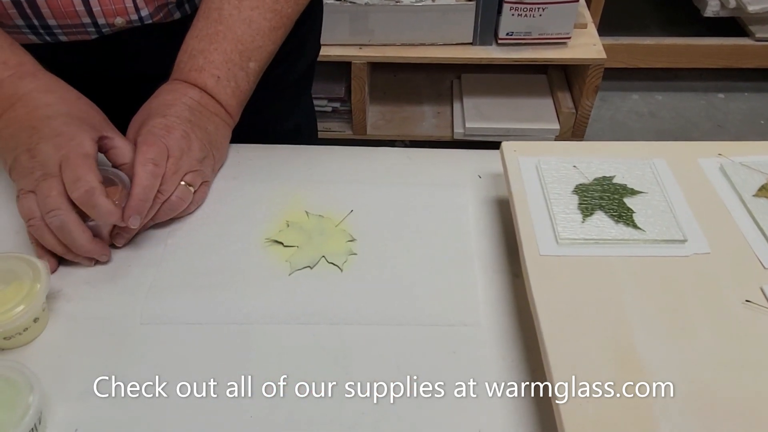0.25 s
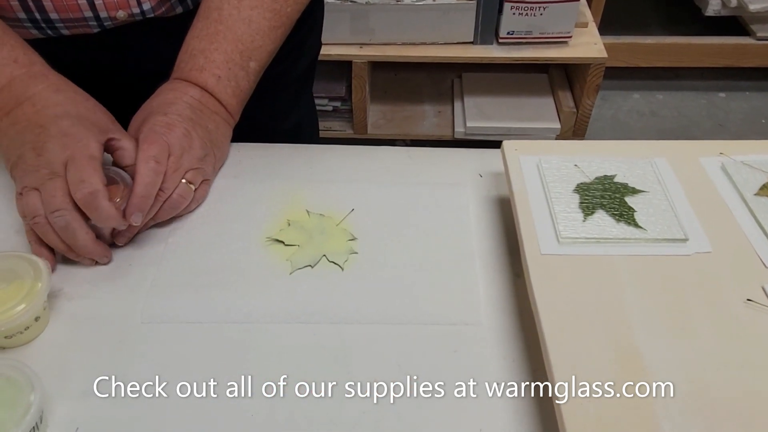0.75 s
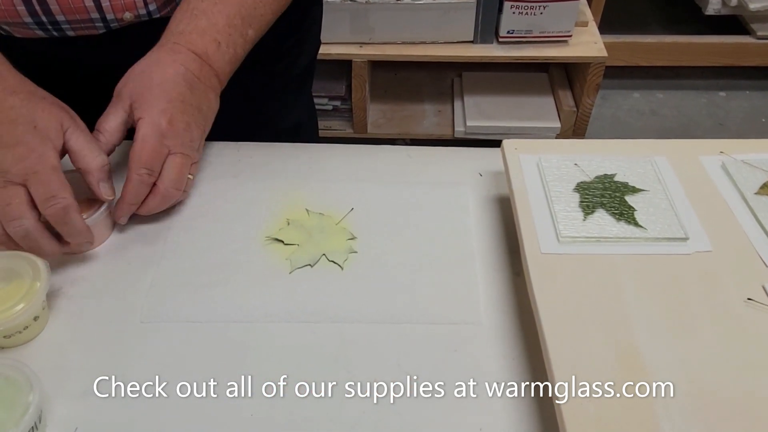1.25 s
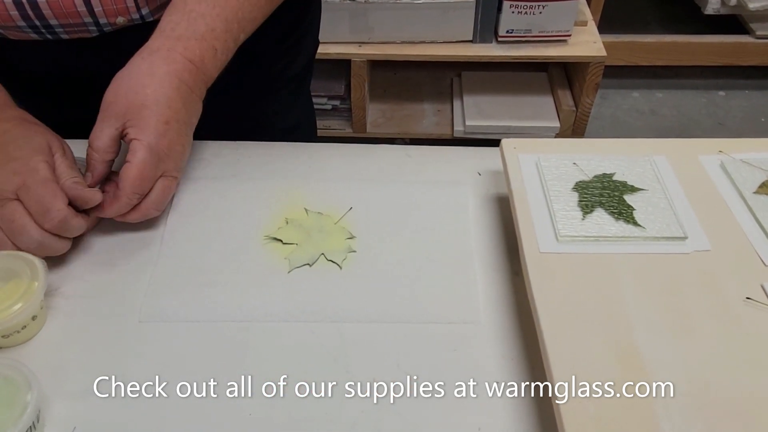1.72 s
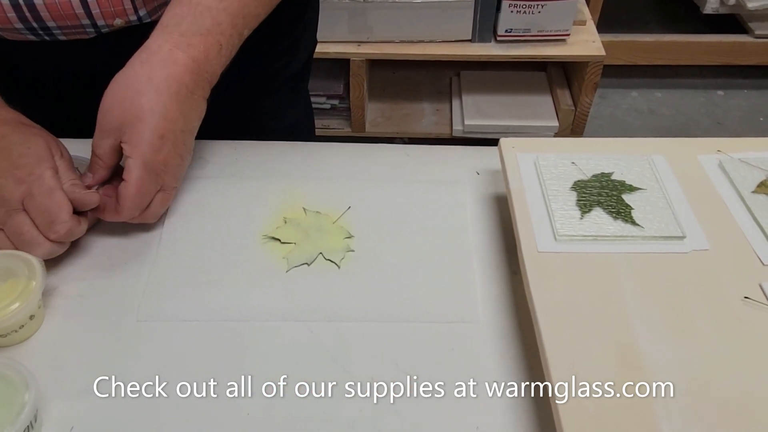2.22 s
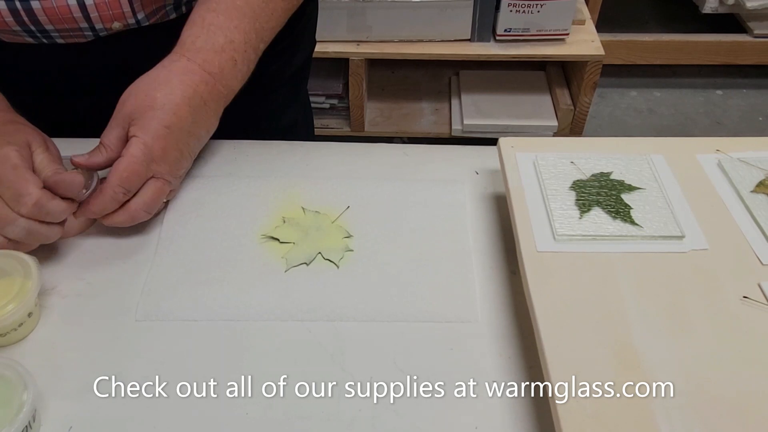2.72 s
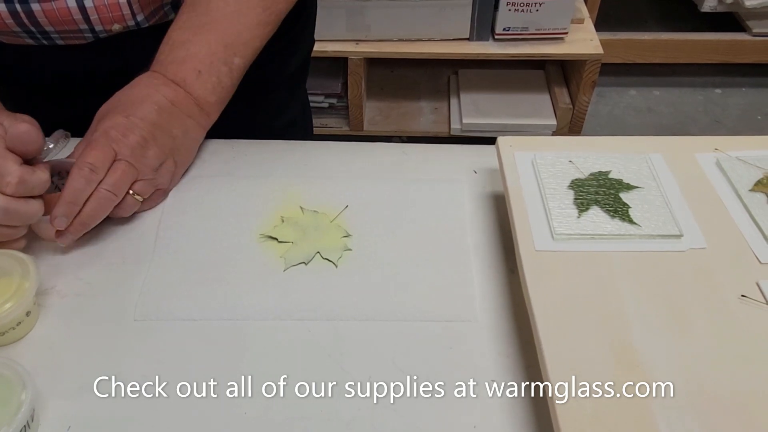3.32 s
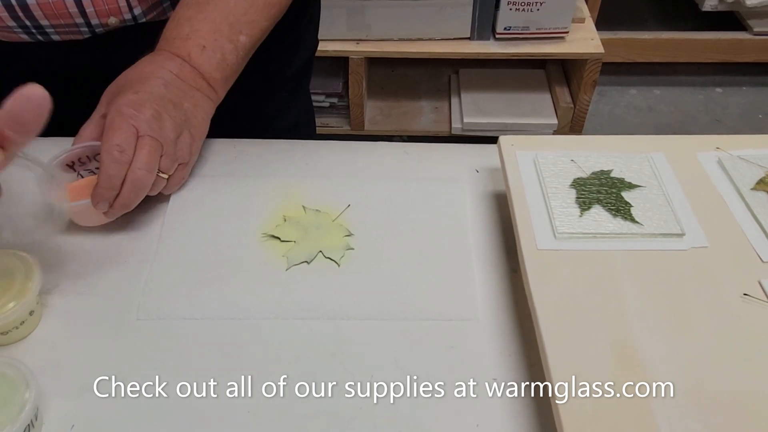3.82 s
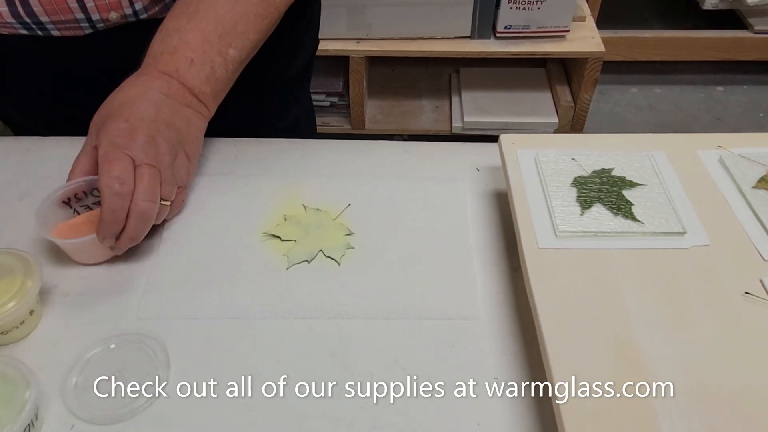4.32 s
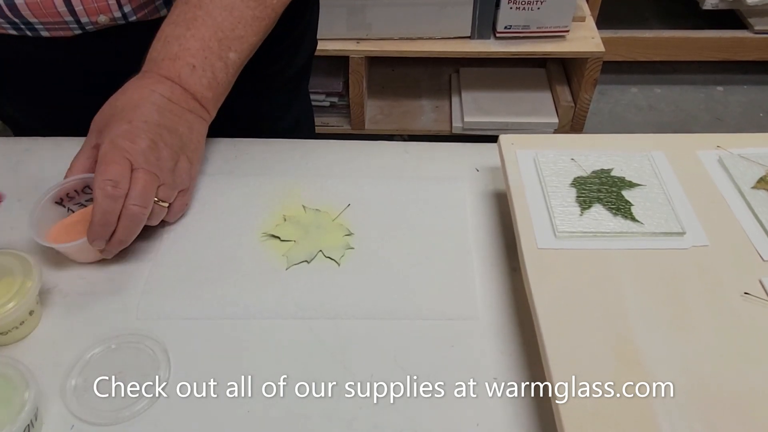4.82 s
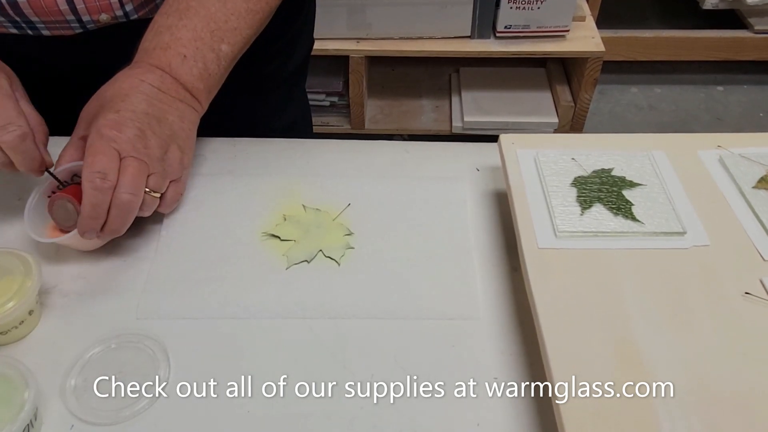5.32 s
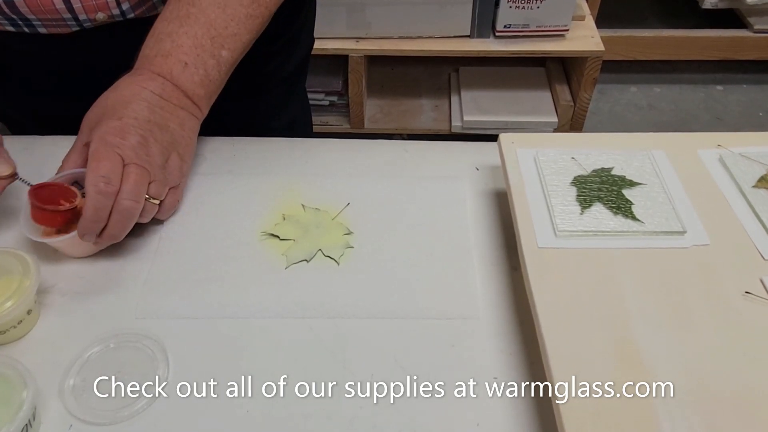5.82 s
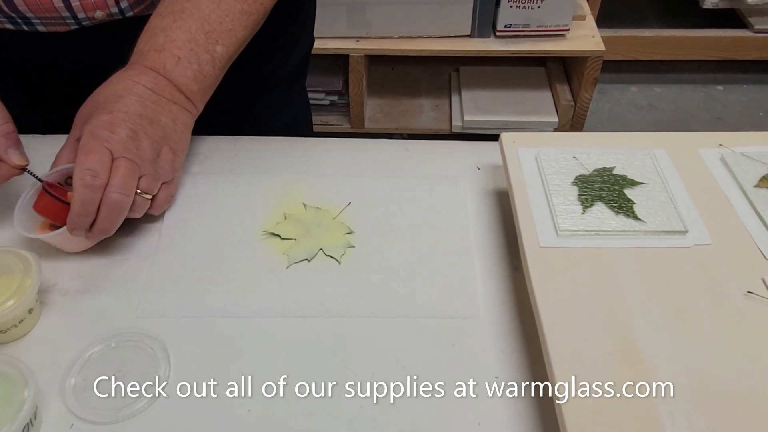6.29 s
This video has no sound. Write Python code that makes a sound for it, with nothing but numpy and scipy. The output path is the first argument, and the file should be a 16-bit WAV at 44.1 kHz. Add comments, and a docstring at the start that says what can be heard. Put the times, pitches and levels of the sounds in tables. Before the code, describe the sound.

Fingers rub and snap a lid off a small plastic cup and drop it rattling on a workbench, with ventilation humming.

```python
"""Prying the lid off a plastic cup

Hands knock a small cup on a workbench, rub round its rim (stick-slip friction) and pry the lid off.
The rim lets go in four sharp snaps; the lid pops free, is dropped and rattles to rest; a scoop goes in.
Each impact rings the damped modes of the plastic. Two microphone ports on a camera hear it all
in a small workshop, over ventilation noise and the low beating hum of motors."""
import sys
import numpy as np
from scipy import signal
from scipy.fft import rfft, irfft, next_fast_len
from scipy.io import wavfile
from scipy.ndimage import uniform_filter1d

SR = 44100
rng = np.random.default_rng(int(sys.argv[2]) if len(sys.argv) > 2 else 0)


def int16_out(signal):
    """Quantize to a 16-bit WAV file."""
    q = np.round(np.clip(np.atleast_2d(signal).T, -1, 1) * 32767)
    wavfile.write(sys.argv[1], SR, q.astype(np.int16))


N = 288855

# Modes of the rim. Each row: frequency in Hz, relative level in dB, 60 dB decay time in seconds.
RIM_RESONANCES = [(1340, -11.5, 0.016), (2000, -9, 0.013), (2440, -8, .009), (3836, -6, 0.007),
                  (4590, 2, 0.012), (5150, 4, 0.012), (6940, -1.5, 0.0039), (7990, -7.5, 0.00802),
                  (13330, -2.5, 0.006)]
# What the struck rim radiates at full focus. Each row: frequency in Hz, relative level in dB.
RIM_SPECTRUM = [(550, -23.5), (1700, -9), (4100, 0), (7700, -4), (12600, -20.5)]


def rim_snaps():
    """Sudden release of elastic strain: the rim slips over the cup's lip and rings."""
    # Each row: start in seconds, level in dB, tilt in dB per octave, focus, pitch factor due to strain.
    snaps = [(0.903, -45.5, 0, 0.4, 0.62), (1.1768, -54.5, 0, 0.086, 0.89), (1.1947, -57.5, 4.5, 0.13, .9),
             (1.5354, -51.5, 7, .5, 1), (1.5652, -51, 5.5, 0.59, 1.1), (1.6171, -60.5, 4, 0.18, 1.03),
             (1.987, -64, -4, 0.17, 0.44), (2.015, -33.5, 0, 0.42, .67), (2.116, -27, 1.3, 0.99, 1.02),
             (2.2216, -29.5, 0.7, 0.65, 0.7), (2.3798, -19, 0, 0.91, 1.0),
             (2.5625, -45.5, -1.5, 0.084, 0.89), (2.6866, -45, -1, 0.16, 1.17),
             (3.136, -60, 9.5, 0.23, .99), (3.4859, -50.5, -4, 0.49, 1.46), (3.574, -51, 3.5, 0.55, 1)]
    return impacts(snaps, RIM_RESONANCES, RIM_SPECTRUM,
                   crack_db=7.5, crack_s=0.0016, scatter=0.047, trim_db=-1)


def lid_pop():
    """Free vibration after release: the lid pops clear of the cup."""
    pop = [(3.4271, -28, 0, 1)]  # Each row: start in seconds, level in dB, tilt in dB per octave, focus.
    modes = [(728, -9.5, 0.028), (1140, -10.5, 0.015), (1380, -3, 0.016), (1970, -3.5, 0.0082),
             (2700, -3, 0.011), (4870, 1.5, 0.015)]  # Each row: frequency in Hz, level in dB, 60 dB decay time in seconds.
    spectrum = [(550, -9.5), (1700, 0), (4100, -9.5), (7700, -14), (12600, -23)]  # Each row: frequency in Hz, radiated level in dB.
    return impacts([(*row, 1) for row in pop], modes, spectrum,
                   crack_db=3, crack_s=0.0014, scatter=0.0084, trim_db=-1)


def lid_bounces():
    """Inelastic collisions: the dropped lid rings at each bounce as it settles."""
    bounces = [(4.0349, -34.5, 0.45), (4.0388, -42, 0.33), (4.089, -26.5, 1.15), (4.1185, -25, 1.19),
               (4.1261, -40, 0.66), (4.1311, -38, 1.4), (4.1725, -42.5, 1.1), (4.1989, -35, 1.1),
               (4.2196, -34, 0.96), (4.237, -40.5, 0.69), (4.2437, -36.5, .9), (4.2528, -46, 0.83),
               (4.262, -42.5, 0.88), (4.2781, -42, 0.71), (4.3117, -47, 0.84), (4.3319, -45.5, .65),
               (4.3471, -41.5, 0.78)]  # Each row: start in seconds, level in dB, focus.
    modes = [(1220, -17, 0.081), (2077, -9, 0.057), (2532, -0.5, 0.075), (2637, 1, 0.031),
             (2870, -2, 0.024), (3300, -15, .05), (3700, -6.5, 0.033), (3870, -10, 0.02), (4150, -3, 0.021),
             (4630, -5, 0.011), (5300, -9, 0.012), (6500, -29, 0.014), (8260, -12, 0.028),
             (8780, -7.5, 0.022)]  # Each row: frequency in Hz, level in dB, 60 dB decay time in seconds.
    spectrum = [(550, -17), (1700, 0), (4100, -1), (7700, -11.5), (12600, -19)]  # Each row: frequency in Hz, radiated level in dB.
    return impacts([(s, db, 0, focus, 1) for s, db, focus in bounces], modes, spectrum,
                   crack_db=4.5, crack_s=0.0021, scatter=0.0096, trim_db=0)


def cup_knocks():
    """Impulse response of a shell: the bench or the scoop knocks the cup."""
    knocks = [(0.0185, -23.5, 1, 0.55), (0.0271, -30.5, 1.5, 1.3), (0.5955, -53.5, -4.5, .7),
              (5.5426, -68, -5, 0.8)]  # Each row: start in seconds, level in dB, tilt in dB per octave, focus.
    modes = [(370, -17, 0.08), (577, -8, 0.038), (771, 1.5, 0.053), (835, 0.5, 0.034), (1056, -0.5, 0.03),
             (1110, -2, 0.03), (1400, -4.5, .028), (1705, -15, 0.016), (2050, -1, 0.018),
             (2835, -8.5, .025), (3610, -7.5, .02), (5414, -14, .012)]  # Each row: frequency in Hz, level in dB, 60 dB decay time in seconds.
    spectrum = [(550, 1), (1700, 3), (4100, -7.5), (7700, -14.5), (12600, -21.5)]  # Each row: frequency in Hz, radiated level in dB.
    return impacts([(*row, 1) for row in knocks], modes, spectrum,
                   crack_db=9.5, crack_s=0.0023, scatter=0.007, trim_db=0.5)


def scoop_ticks():
    """Brief contact gives a broad spectrum: the scoop ticks lightly against the cup."""
    ticks = [(5.741, -71.5), (6.3523, -74), (6.368, -69.5), (6.412, -69.5)]  # Each row: start in seconds, level in dB.
    return impacts([(s, db, 0, 0.1, 0.9) for s, db in ticks], RIM_RESONANCES, RIM_SPECTRUM,
                   crack_db=8, crack_s=0.0012, scatter=0.041, trim_db=0.5)


def impacts(blows, modes, spectrum, crack_db, crack_s, scatter, trim_db):
    """Modal superposition plus a noise crack; focus 0 is a flat tick, 1 the full spectrum.
    Levels are relative. A thin wall radiates unevenly: row 0 goes to the camera, two into the room."""
    bands = [(300, 1000), (1000, 2800), (2800, 6000), (6000, 10000), (10000, 16000)]  # Thud, knock, crack, tick, fizz. Each row: lower and upper edge in Hz.
    crack_spectrum = [(200, -11.5), (480, -8.5), (900, -4), (5000, 6), (8000, 2), (10700, -5.5),
                      (13000, -5.5), (14300, -6), (16000, -18.5)]  # The bright onset. Each row: frequency in Hz, gain in dB.
    t, directions = np.arange(SR // 7) / SR, np.zeros((3, N))
    hz, db, t60 = np.transpose(modes)[:, :, None]
    attack_samples, f = 323, np.fft.rfftfreq(2048, 1 / SR)
    centres = np.sqrt(np.prod(bands, axis=1))
    for start, level_db, tilt, focus, pitch in blows:
        band_db = level_db + tilt * np.log2(centres / centres[2]) + focus * curve(spectrum, centres / pitch)
        for direction in directions:
            detune, share, turn = rng.standard_normal((3, len(modes), 1))
            phase = 2 * np.pi * (hz * pitch * (1 + scatter * detune) * t + turn)
            ring = (amp(db + 1.5 * share - 60 * t / t60) * np.sin(phase)).sum(0)
            burst = rng.standard_normal(len(t)) * np.exp(-t / crack_s)
            sound = ring + amp(crack_db) * colour(burst, crack_spectrum)
            for _ in range(2):  # bring each band of the attack toward its level
                power = abs(rfft(sound[:attack_samples], 2048)) ** 2 / (1024 * attack_samples)
                attack_db = [10 * np.log10(power[(f >= lo) & (f < hi)].sum() + 1e-20) for lo, hi in bands]
                sound = colour(sound, np.c_[centres, band_db - attack_db])
            add(direction, start, sound)
    bandpass = signal.butter(2, [260, 14500], "band", fs=SR, output="sos")
    return amp(trim_db) * signal.sosfilt(bandpass, directions)


def finger_rubs(body_db=-0.5, rasp_db=-2, hiss_db=-2):
    """Frictional excitation: strokes sound the cup's hollow, its wall and the skin, over a faint hiss."""
    # Each row: time of firmest grip, rise and fall in seconds, wall rasp in dB,
    # then hollow body and skin hiss in dB relative to the rasp.
    strokes = [(0.385, 0.069, 0.044, -60, 1, -11), (0.655, 0.042, 0.038, -62, 0, -1.5),
               (0.825, 0.12, 0.061, -59.5, -1, -3.5), (0.892, 0.024, 0.045, -48, -6.5, -4),
               (1.02, .11, 0.042, -61.5, 2, -3.5), (1.164, 0.036, 0.051, -57, 3, 1.5),
               (1.29, 0.051, 0.05, -57.5, 3, -1.5), (1.38, 0.046, 0.073, -54.5, 0, 6.5),
               (1.435, 0.073, 0.029, -47.5, -4.5, 3.5), (1.55, 0.043, 0.057, -52.5, -3.5, 2),
               (1.709, 0.043, 0.031, -45.5, -9.5, -3), (2.521, .025, 0.044, -47, -1, 0.5),
               (2.566, 0.038, 0.019, -49.5, 9, -7), (2.64, 0.057, 0.16, -55.5, -2, 1.5),
               (2.729, 0.033, 0.031, -48.5, 5, 2), (2.9, .13, 0.12, -60, 1.5, -1),
               (2.958, .035, 0.016, -47.5, -2.5, -3.5), (3.075, 0.075, 0.083, -46, -3.5, -9.5),
               (3.194, 0.097, 0.068, -49, -2.5, -6.5), (3.412, 0.11, 0.031, -53.5, -2.5, -5),
               (3.559, 0.19, .06, -56, -6.5, -6.5), (3.839, 0.22, 0.12, -63.5, -10, -12.5),
               (6.419, 0.063, .06, -74.5, -4, -6), (6.504, 0.054, 0.022, -56, -1.5, -1.5)]
    # Spectra of hollow, wall and skin. Each row: frequency in Hz, gain in dB.
    body_spectrum = [(120, -7.5), (350, -7), (520, -5.5), (760, 2), (1000, -5.5), (1400, -3.5),
                     (2100, -6.5), (3000, -31.5)]
    rasp_spectrum = [(1900, -23.5), (2650, -6.5), (3500, 0), (4000, -3.5), (4600, -2), (5400, -2.5),
                     (6500, -7.5), (7700, -8), (8700, -21.5)]
    hiss_spectrum = [(4600, -25), (6000, 2), (7500, -0.5), (9400, -5), (11000, -5), (12700, -6.5),
                     (14200, -9.5), (15800, -23)]
    faint_hiss = [(0, -82), (4.0, -78), (4.55, -78.5), (5.3, -84.5), (6.0, -95), (6.55, -97)]  # Thins out toward the end. Each row: time in seconds, level in dB.
    *_, wall, body, skin = np.transpose(strokes)
    hollow = scrape(stroke_envelope(strokes, wall + body + body_db), body_spectrum)
    rasp = scrape(stroke_envelope(strokes, wall + rasp_db), rasp_spectrum)
    hiss = scrape(stroke_envelope(strokes, wall + skin + hiss_db), hiss_spectrum)
    return hollow + rasp + hiss + scrape(faint_hiss, hiss_spectrum)


def stroke_envelope(strokes, peaks_db, drop_db=19.5, roundness=1.35):
    """Incoherent addition: strokes sum in power, each drop_db down one rise or fall from its peak."""
    t = np.arange(0, N, 64) / SR
    peak_s, rise_s, fall_s = np.transpose(strokes)[:3, :, None]
    away = np.maximum((peak_s - t) / rise_s, (t - peak_s) / fall_s)
    power = amp(peaks_db[:, None] - drop_db * abs(away) ** roundness) ** 2
    return np.c_[t, 10 * np.log10(power.sum(0) + 1e-12)]


def rim_grind():
    """Friction under load: the strained rim grinds over the lip just before the loudest snap."""
    envelope = [(2.323, -75), (2.329, -37.5), (2.345, -39.5), (2.376, -41), (2.383, -85)]  # Each row: time in seconds, level in dB.
    spectrum = [(600, -23), (1200, -2), (1700, -9.5), (2250, 1), (2900, -7), (4000, -8), (6000, -20.5)]  # Each row: frequency in Hz, gain in dB.
    return scrape(envelope, spectrum)


def lid_slide():
    """Friction through narrow resonances: the loose lid slides along the rim with a thin squeak."""
    envelope = [(2.8, -80), (2.84, -65), (2.92, -59), (2.955, -46.5), (3.0, -68), (3.07, -55), (3.13, -65),
                (3.19, -52.5), (3.24, -72), (3.28, -85)]  # Each row: time in seconds, level in dB.
    spectrum = [(550, -26), (780, 3.5), (1050, -3), (1700, -21.5), (3900, -20), (4550, 0.5), (5300, -18.5),
                (6900, -6), (7750, -1.5), (8500, -30.5)]  # Each row: frequency in Hz, gain in dB.
    return scrape(envelope, spectrum)


def scoop_brush():
    """Granular friction: the scoop brushes through powder."""
    envelope = [(4.91, -94.5), (4.93, -71.5), (4.975, -81), (5.0, -99), (5.125, -95), (5.142, -73.5),
                (5.16, -88.5)]  # Each row: time in seconds, level in dB.
    spectrum = [(2500, -25), (4500, 2), (7000, -3), (8500, -2), (10500, -5), (14000, -12.5), (16000, -23)]  # Each row: frequency in Hz, gain in dB.
    return scrape(envelope, spectrum)


def scrape(envelope, spectrum, grip_db=1.5, fade_s=0.15):
    """Source and filter: slips excite resonances whose strengths waver as the grip changes."""
    spectrogram = signal.stft(colour(slips(), spectrum), nperseg=256)[2]
    grip = uniform_filter1d(rng.standard_normal(spectrogram.shape), size=4, axis=0)
    grip = unit(uniform_filter1d(grip, size=30, axis=1))
    sound = signal.istft(spectrogram * amp(grip_db * grip), nperseg=256)[1][:N]
    s, db = np.transpose(envelope)
    level_db = np.interp(np.arange(N) / SR, np.r_[s[0] - fade_s, s, s[-1] + fade_s], np.r_[-120, db, -120])
    return amp(level_db) * unit(sound)


def slips(per_s=3000, spread_db=3, smooth=0.56, stutter_db=3):
    """Stick-slip friction: tiny impulses of uneven size, clumped by sticking and letting go."""
    sizes = amp(spread_db * np.minimum(rng.exponential(1, N), 5)) * rng.choice([-1, 1], N)
    grains = unit(sizes * (rng.random(N) < per_s / SR))
    return unit((grains + smooth * rng.standard_normal(N)) * amp(stutter_db * drift(160)))


def workshop(directions, wet_db, pan_db, port_lag_s):
    """Multipath propagation: direct sound, left port first, then early echoes and reverberation."""
    echoes = [(.0016, .0019, 0.38), (.0023, 0.0024, 0.14), (.0086, 0.0082, 0.18), (0.009, 0.0082, 0.12),
              (0.015, .0147, 0.18)]  # Bench and shelves. Each row: left and right delay in seconds, gain.
    direct, *outward = directions
    near = np.array([direct, delay(direct, port_lag_s)]) * amp([[pan_db / 2], [-pan_db / 2]])
    for left_s, right_s, gain in echoes:
        near += gain * np.array([delay(outward[0], left_s), delay(outward[1], right_s)])
    reverberation = sum(signal.oaconvolve(x[None], room_tail(), axes=1)[:, :N] for x in outward)
    return near + amp(wet_db) * reverberation


def room_tail(build_s=0.0017, reflections_per_s=5000):
    """Frequency-dependent absorption: sparse reflections die away at a different rate in each band."""
    spectrum = [(300, 0), (800, 4), (1800, 1), (3500, 2), (6000, -1.5), (10000, 0.5), (14000, -0.5)]  # Strongest in the low middle. Each row: frequency in Hz, gain in dB.
    decay = [(200, 0.3), (1000, 0.25), (3000, 0.28), (5500, 0.26), (9000, 0.18), (15000, 0.22)]  # Each row: frequency in Hz, reverberation time in seconds.
    taps = rng.standard_normal((2, SR // 2)) * (rng.random((2, SR // 2)) < reflections_per_s / SR)
    hz, t, spectrogram = signal.stft(taps, SR, nperseg=256)
    gain_db = curve(spectrum, hz)[:, None] - 60 * t / curve(decay, hz)[:, None]
    tail = signal.istft(spectrogram * amp(gain_db), SR, nperseg=256)[1]
    tail *= 1 - np.exp(-(np.arange(tail.shape[1]) / SR / build_s) ** 2)
    return tail / np.linalg.norm(tail, axis=1, keepdims=True)


def motor_hum(main_db=-52.5, partner_db=-57, second_db=-59, fan_db=-63):
    """Beating: two motors of nearly equal speed, a wavering harmonic, a fan swelling in the troughs."""
    motor_hz, fan_hz = 59.2, 42.2
    beat_s, crest_s = 2.1, 0.75
    flutter_db, waver_db, fan_swing_db = 1.35, 1.5, 4
    t = np.arange(N) / SR
    beat = 2 * np.pi * (t - crest_s) / beat_s
    motor, second, fan = 2 * np.pi * (np.outer([motor_hz, 2 * motor_hz, fan_hz], t) + rng.random((3, 1)))
    pair = amp(main_db) * np.sin(motor) + amp(partner_db) * np.sin(motor + beat)
    pair *= amp(flutter_db * drift(8))
    overtone = amp(second_db + waver_db * drift(4.5)) * np.sin(second)
    fan_tone = amp(fan_db - fan_swing_db * np.cos(beat)) * np.sin(fan)
    return np.sqrt(2) * (pair + overtone + fan_tone)


def ventilation(rumble_db=-53, air_db=-57.5, port_lag_s=0.00033):
    """Partial coherence: bass is alike at both ports; higher noise is part directional, part diffuse."""
    # Low rumble and airy room noise. Each row: frequency in Hz, relative spectral density in dB.
    rumble = [(15, -26), (32, 3.5), (46, 19.5), (58, 16.5), (72, 23.5), (88, 17.5), (108, 14.5),
              (124, 18.5), (136, 13), (180, -4), (260, -44)]
    air = [(88, -35.5), (150, -9), (213, -3.5), (254, -9.5), (361, -3.5), (457, -9), (504, -11),
           (545, -10.5), (759, -10.5), (941, -19), (1040, -16.5), (1310, -13.5), (2180, -18), (8400, -38),
           (16000, -74)]
    f = np.fft.rfftfreq(N, 1 / SR)
    left, diffuse = rfft(rng.standard_normal((2, N)))
    coherence = curve([(100, 0.99), (200, 0.89), (400, 0.3), (1500, 0.8), (3000, 0.63), (6000, 0.038)], f)
    right = coherence * left * np.exp(-2j * np.pi * f * port_lag_s) + np.sqrt(1 - coherence ** 2) * diffuse
    return sum(amp(db) * unit(irfft(np.array([left, right]) * amp(curve(spectrum, f)), N))
               for spectrum, db in ((rumble, rumble_db), (air, air_db)))


def colour(x, points):
    """Minimum-phase (causal) filtering through (Hz, dB) points."""
    size = next_fast_len(len(x) + 2048)
    log_gain = np.log(amp(curve(points, abs(np.fft.fftfreq(size, 1 / SR)))))
    response = np.exp(np.conj(signal.hilbert(log_gain)))
    return np.fft.ifft(np.fft.fft(x, size) * response).real[:len(x)]


def curve(points, hz):
    """Interpolation of (Hz, value) points on a log-frequency axis."""
    f, value = np.transpose(points)
    return np.interp(np.log(hz + 1), np.log(f + 1), value)


def drift(per_s):
    """Random modulation of rms 1, with per_s knots a second."""
    knots = rng.standard_normal(int(N / SR * per_s) + 2)
    return unit(np.interp(np.arange(N) * per_s / SR, np.arange(len(knots)), knots))


def add(mix, s, sound):
    """Superposition of a sound at s seconds."""
    part = mix[max(round(s * SR), 0):][:len(sound)]
    part += sound[:len(part)]


def delay(x, s):
    """Propagation delay of s seconds."""
    return np.pad(x, (max(round(s * SR), 0), 0))[:N]


def amp(db):
    """Decibels to amplitude."""
    return 10 ** (np.asarray(db) / 20)


def unit(x):
    """Normalisation to rms 1."""
    return x / np.sqrt(np.mean(x ** 2) + 1e-20)


def scene():
    """Time and level differences put cup and lid a little to the left; each port colours them."""
    # The right port favours the presence range, the left the upper treble.
    port_tilt = [(100, -3), (1000, 0), (2600, 0.5), (3400, -5.5), (4400, -9.5), (5300, -9), (6500, -1.5),
                 (7500, -1), (8500, 3), (10000, 7.5), (12300, -5), (14000, 0.5), (15500, 1)]  # Each row: frequency in Hz, left minus right in dB.
    snaps, ticks, knocks, pop, bounces = rim_snaps(), scoop_ticks(), cup_knocks(), lid_pop(), lid_bounces()
    cup = workshop(snaps + ticks + pop, wet_db=-11, pan_db=1.5, port_lag_s=0.00025)
    friction = finger_rubs() + rim_grind() + lid_slide() + scoop_brush()
    cup += workshop([friction] * 3, wet_db=-9, pan_db=1.5, port_lag_s=0.00023)
    cup += workshop(knocks, wet_db=-10.5, pan_db=2, port_lag_s=0.00023)
    cup += workshop(bounces, wet_db=-10.5, pan_db=3, port_lag_s=0.00026)
    hz, tilt_db = np.transpose(port_tilt)
    ports = [colour(cup[0], np.c_[hz, tilt_db / 2]), colour(cup[1], np.c_[hz, -tilt_db / 2])]
    return np.array(ports) + (motor_hum() + ventilation()) * amp([[-0.2], [0.2]])


def record(dry, bass_hz=19, edge_hz=16300):
    """Band limiting: the left capsule rolls off the deep bass, and both lose the highest treble."""
    left = signal.sosfilt(signal.butter(1, bass_hz, "high", fs=SR, output="sos"), dry[0])
    lowpass = signal.firwin(401, edge_hz, window=("kaiser", 9), fs=SR)
    return signal.oaconvolve(np.array([left, dry[1]]), lowpass[None], "same")


dry = scene()
out = record(dry)
int16_out(out)
```